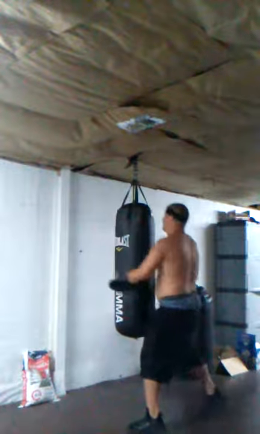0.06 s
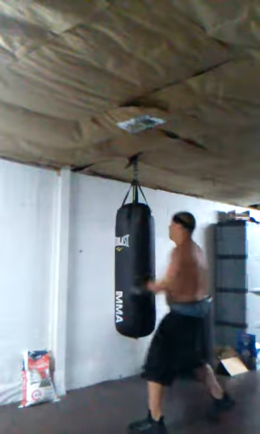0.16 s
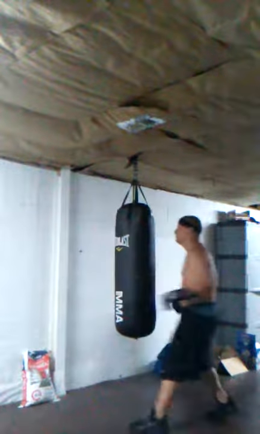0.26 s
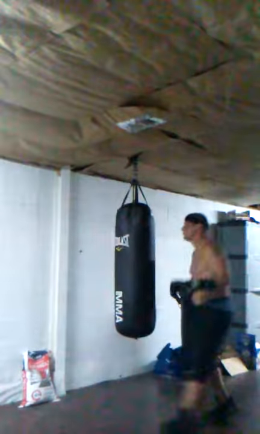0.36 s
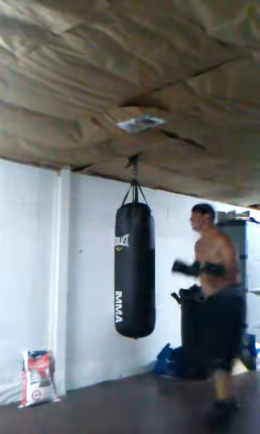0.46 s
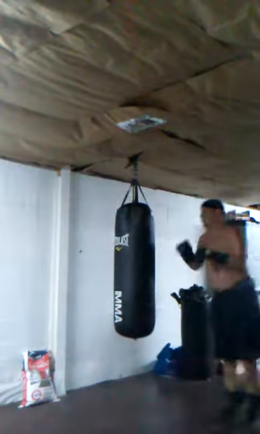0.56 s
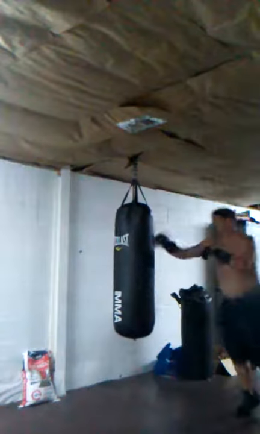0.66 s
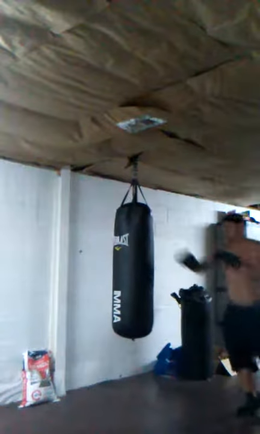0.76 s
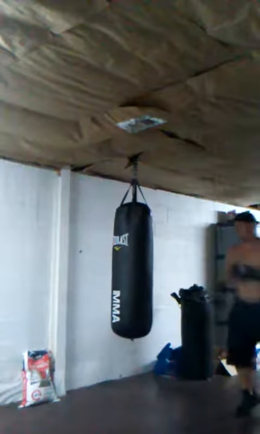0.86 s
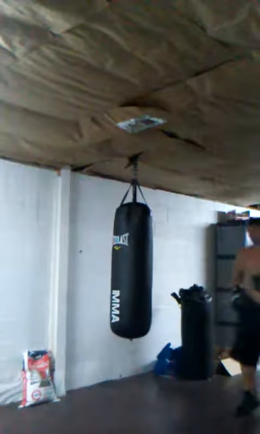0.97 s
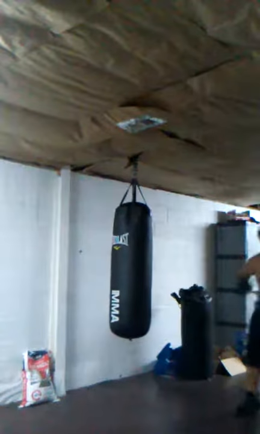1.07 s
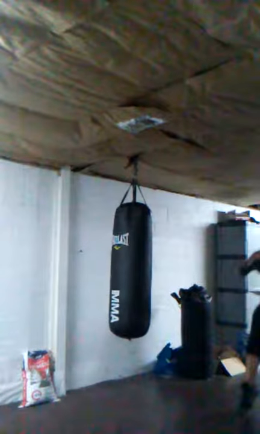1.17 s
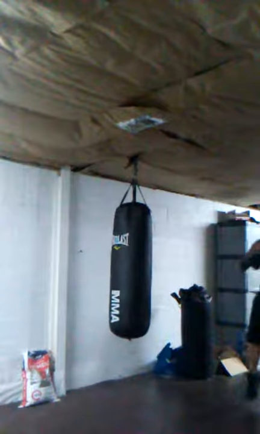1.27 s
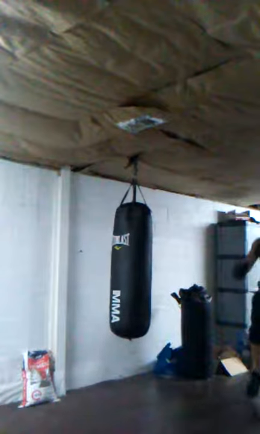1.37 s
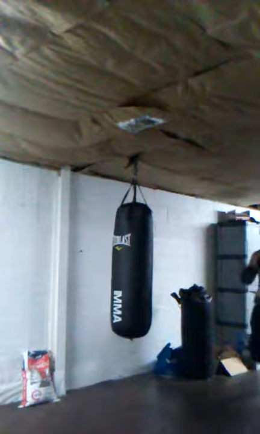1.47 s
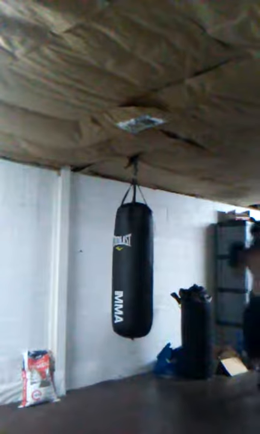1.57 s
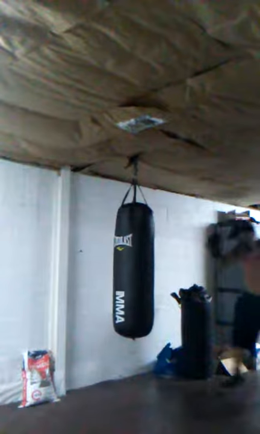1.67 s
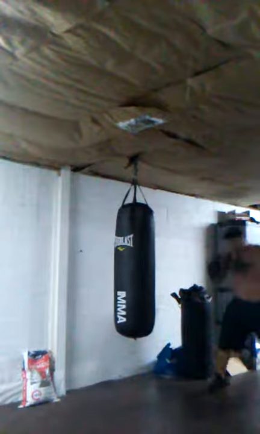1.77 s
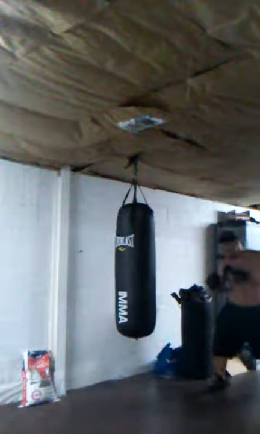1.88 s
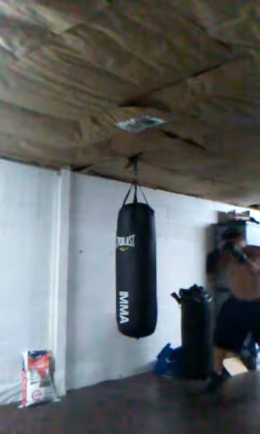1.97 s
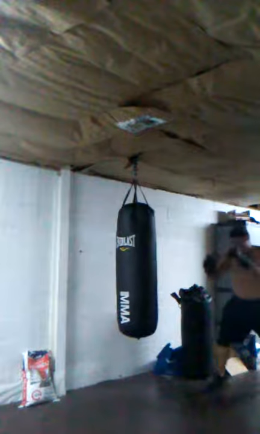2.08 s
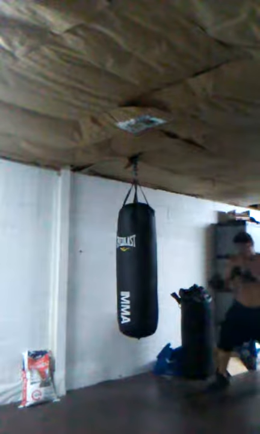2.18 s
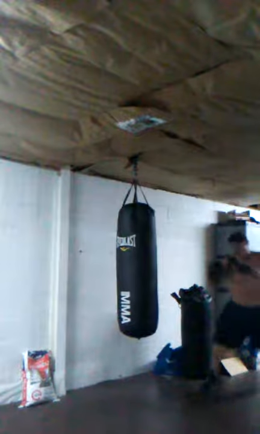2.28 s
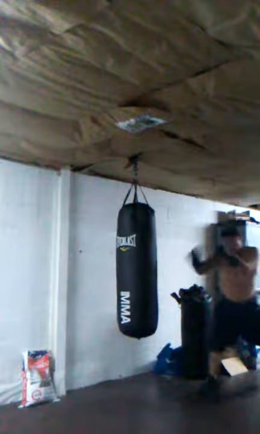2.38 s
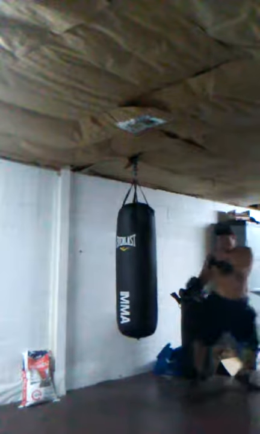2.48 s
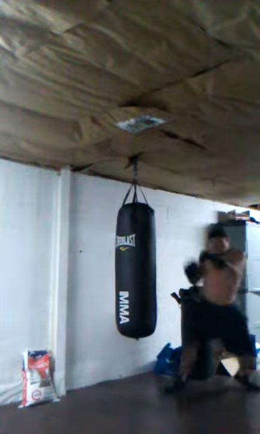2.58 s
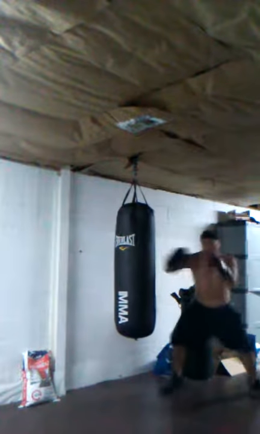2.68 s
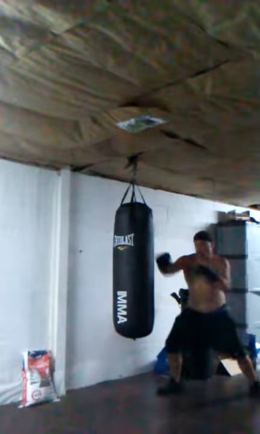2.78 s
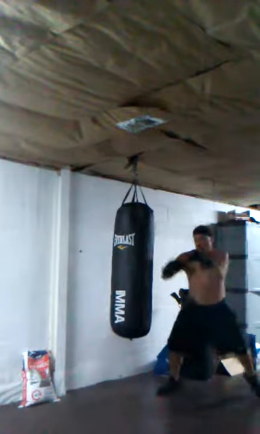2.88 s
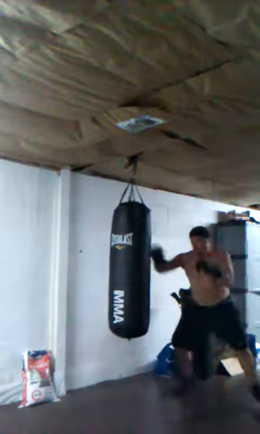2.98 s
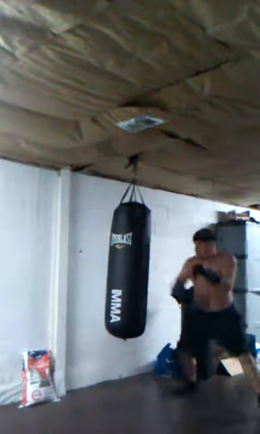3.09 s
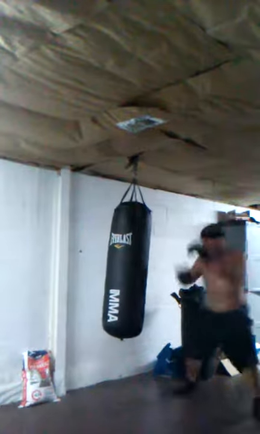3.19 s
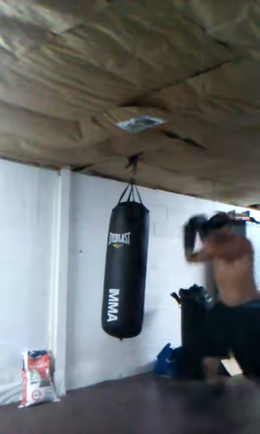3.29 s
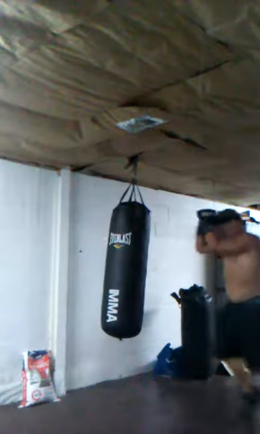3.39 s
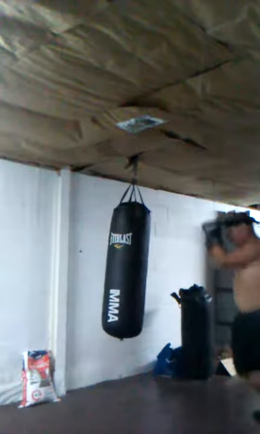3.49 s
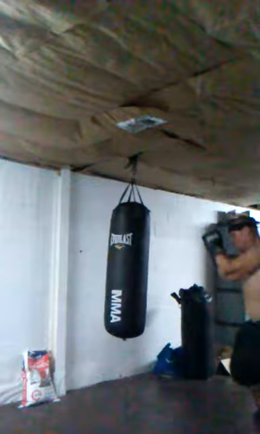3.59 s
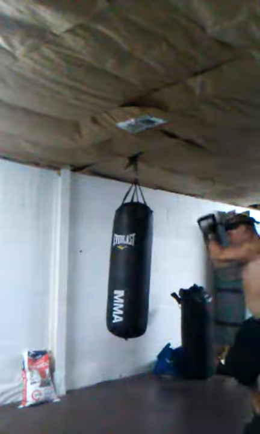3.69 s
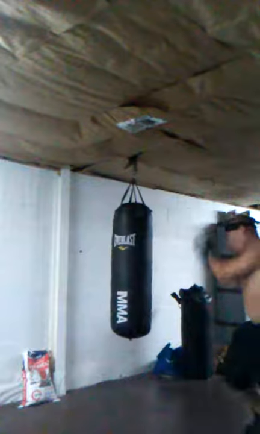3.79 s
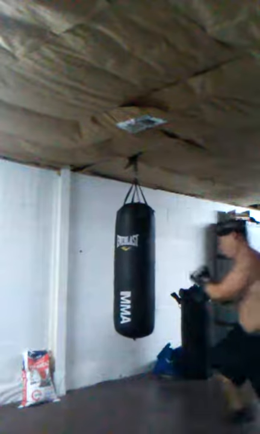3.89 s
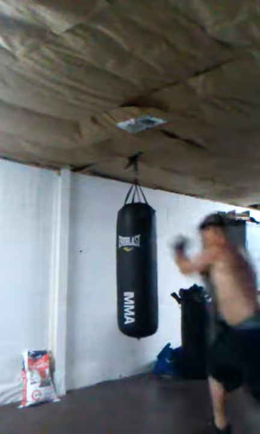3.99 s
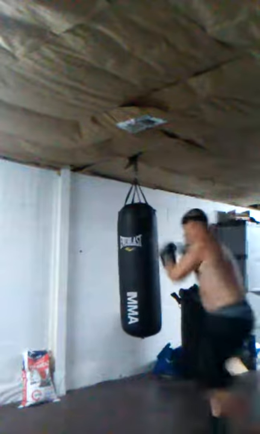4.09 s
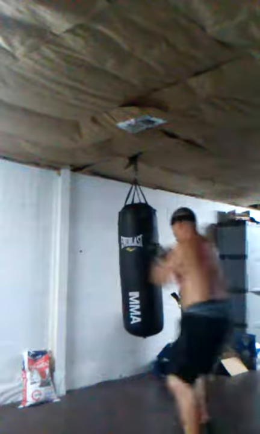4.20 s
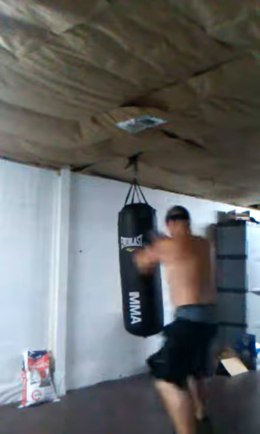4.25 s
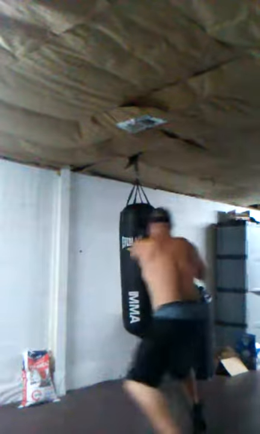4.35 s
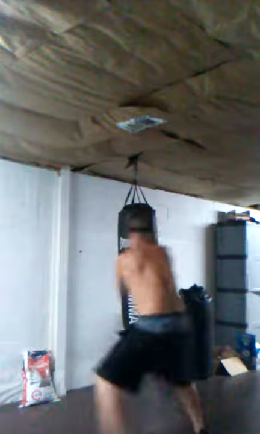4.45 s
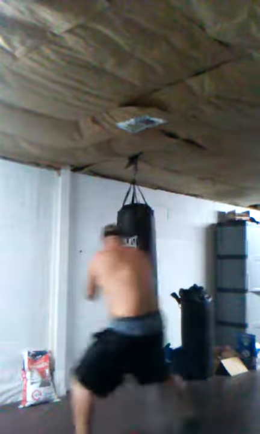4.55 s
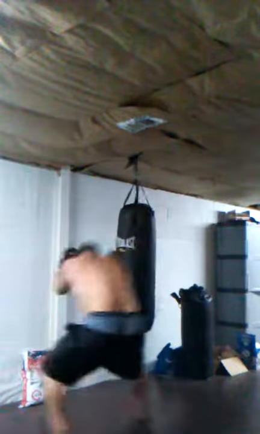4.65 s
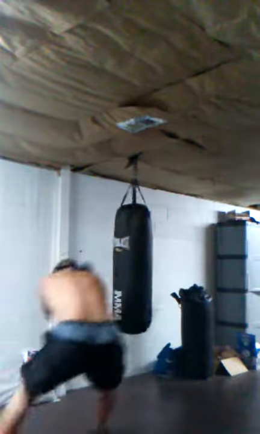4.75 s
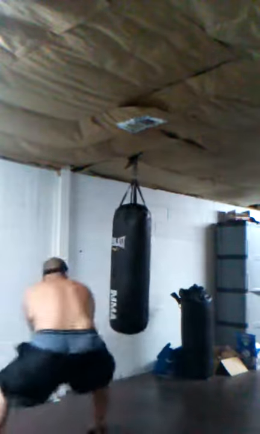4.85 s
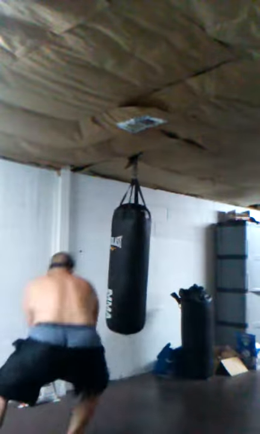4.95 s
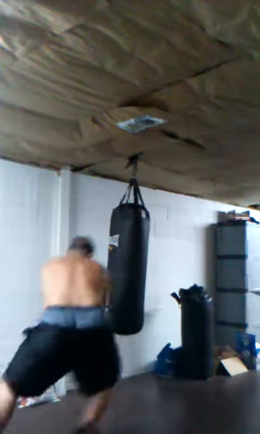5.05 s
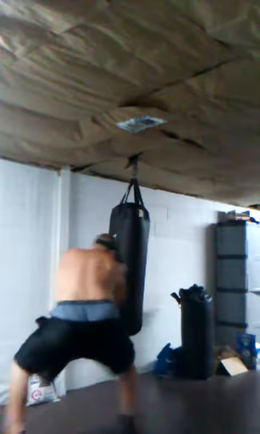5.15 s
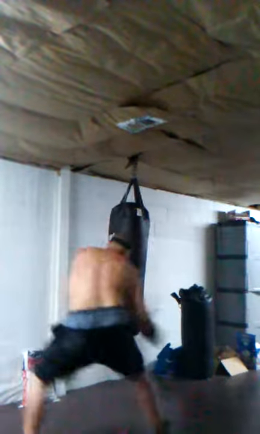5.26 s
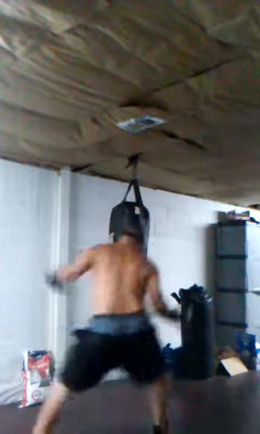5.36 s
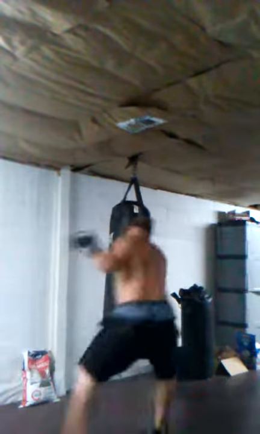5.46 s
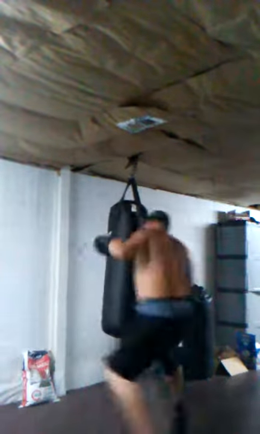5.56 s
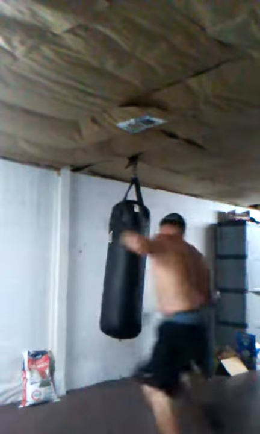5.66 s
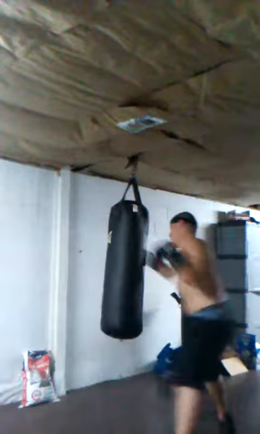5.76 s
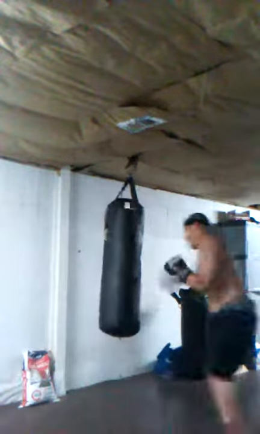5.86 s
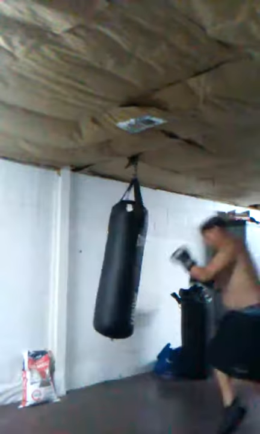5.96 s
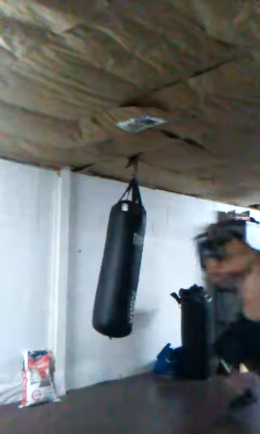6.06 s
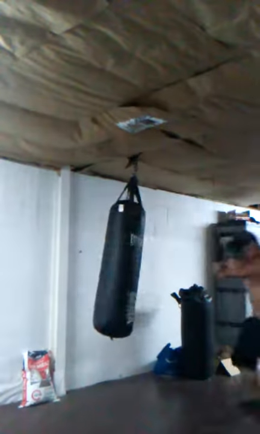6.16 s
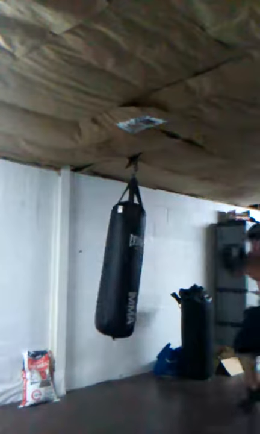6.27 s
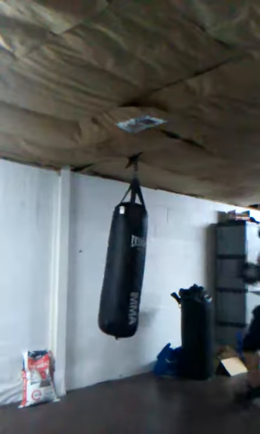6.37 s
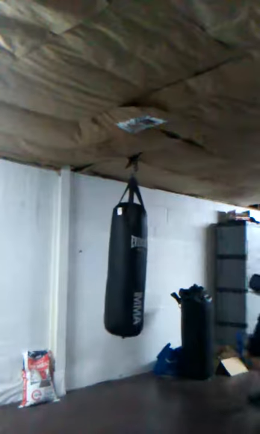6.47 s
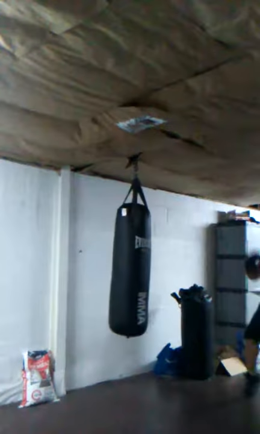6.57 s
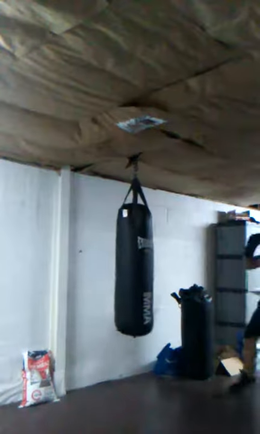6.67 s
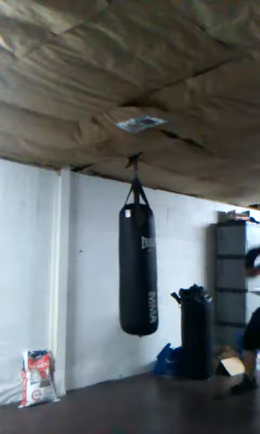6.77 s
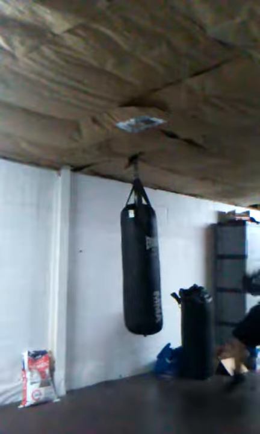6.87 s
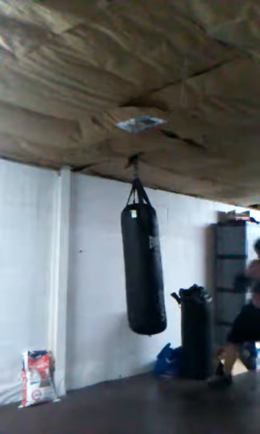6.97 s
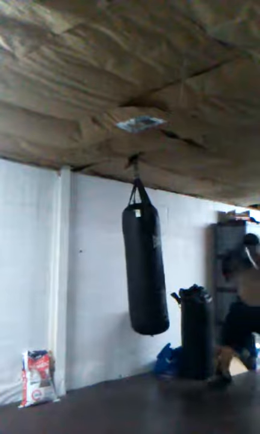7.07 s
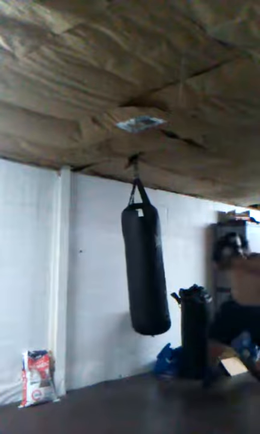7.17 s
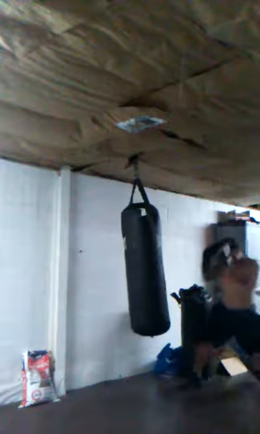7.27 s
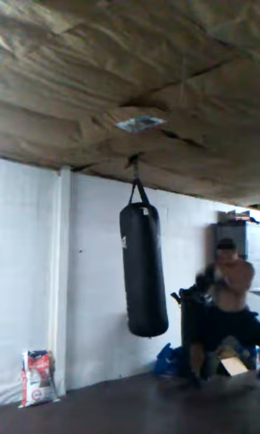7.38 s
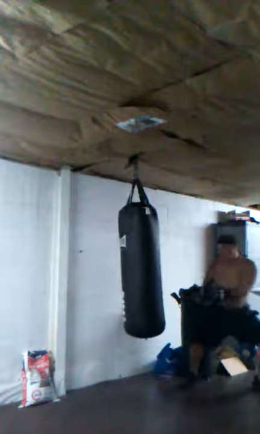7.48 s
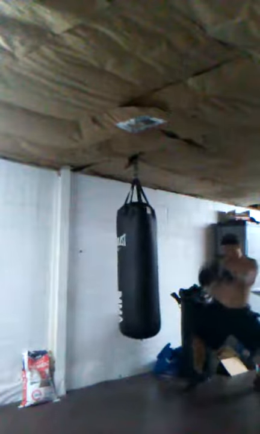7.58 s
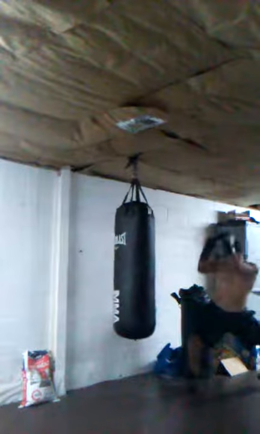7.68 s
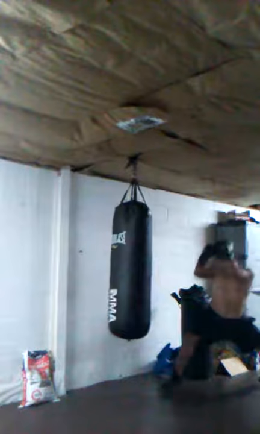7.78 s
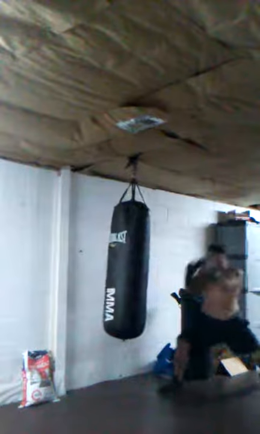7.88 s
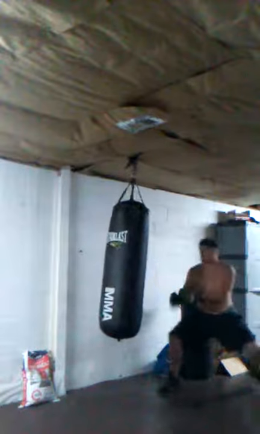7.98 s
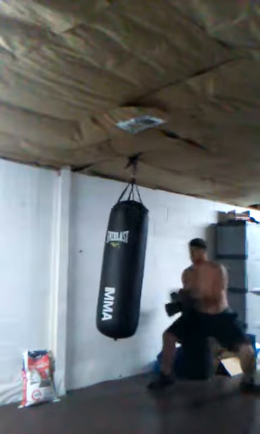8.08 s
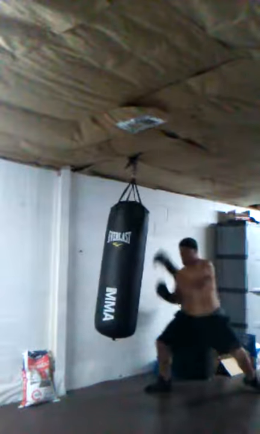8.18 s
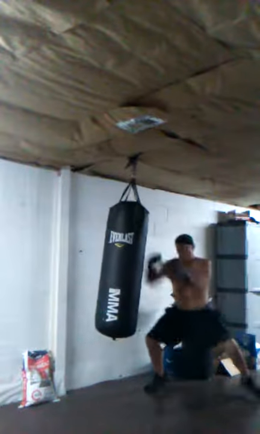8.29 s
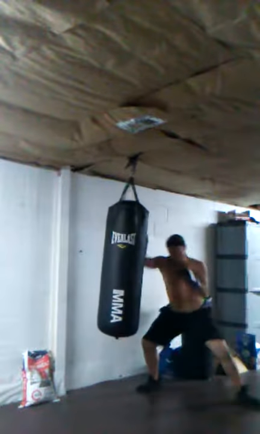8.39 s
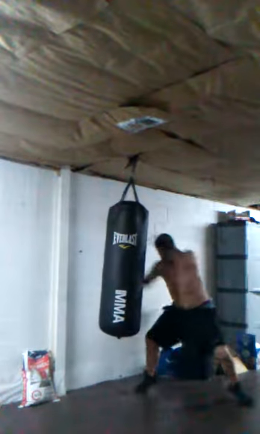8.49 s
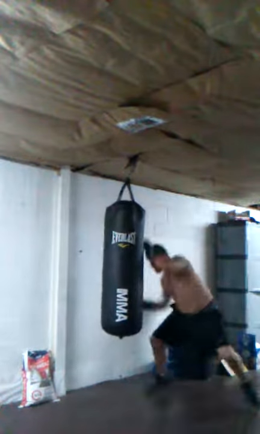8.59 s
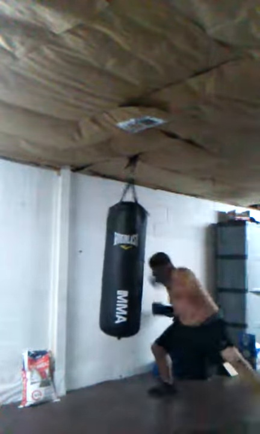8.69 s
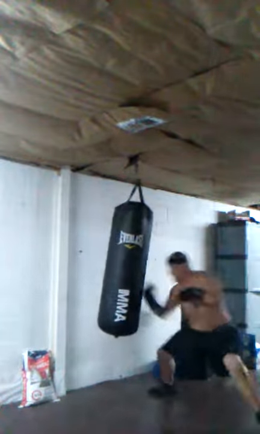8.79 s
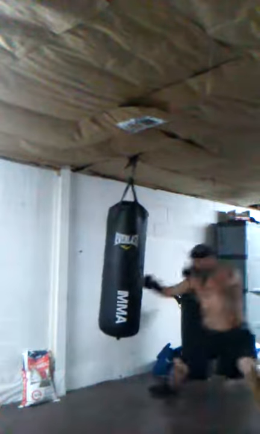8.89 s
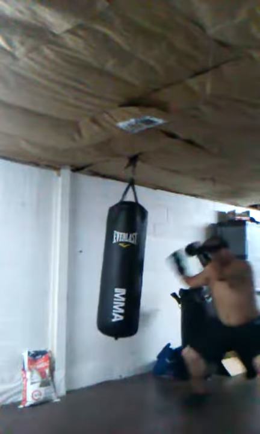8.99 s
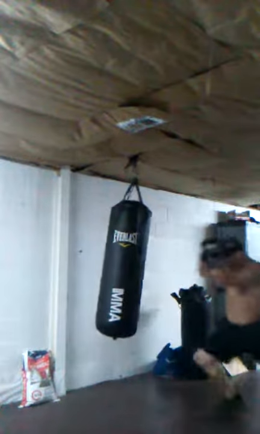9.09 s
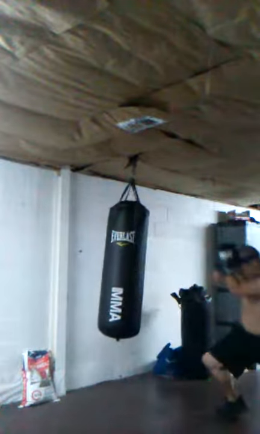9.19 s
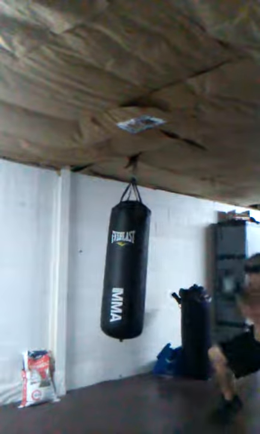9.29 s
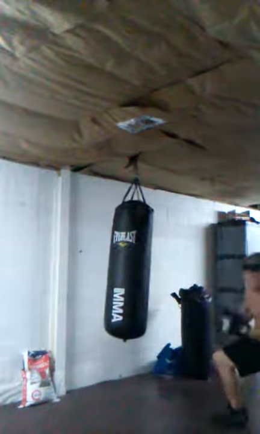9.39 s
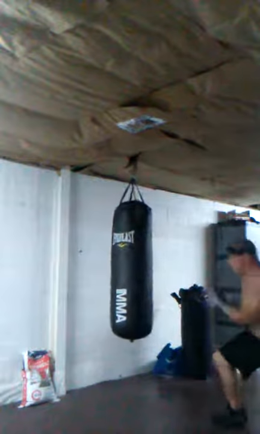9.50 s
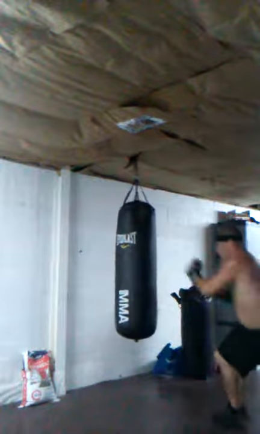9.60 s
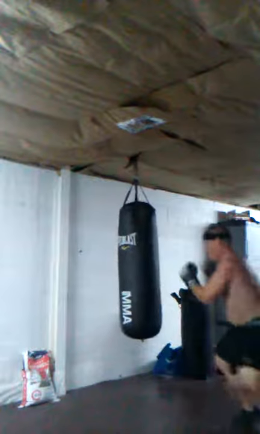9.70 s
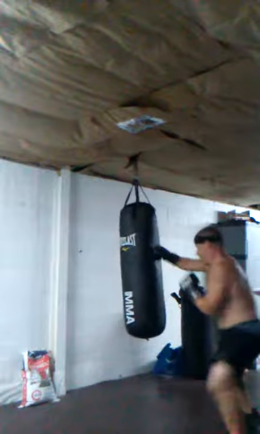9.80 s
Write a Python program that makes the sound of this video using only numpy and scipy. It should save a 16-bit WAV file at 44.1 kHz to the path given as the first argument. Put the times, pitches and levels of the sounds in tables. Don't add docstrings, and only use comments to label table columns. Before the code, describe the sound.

Sharp padded punches pop and boom on a swinging heavy bag, between shuffling soles, light knocks and clothing rustle over faint room hum and hiss.

```python
import sys
import numpy as np
from scipy import signal
from scipy.fft import rfft, irfft
from scipy.io import wavfile

SR = 44100
rng = np.random.default_rng(int(sys.argv[2]) if len(sys.argv) > 2 else 0)


def to_wav(s):
    ch = np.atleast_2d(s).T
    pcm = np.round(np.clip(ch, -1, 1) * 32767)
    wavfile.write(sys.argv[1], SR, pcm.astype(np.int16))


def gain_from_decibels(decibels):
    exponent = np.asarray(decibels, float) / 20
    return 10 ** exponent


N = 434385
SPAN = 16384

# (time [s], pop peak [dB], pop centre [Hz],
# slap relative to the pop [dB], joist boom [dB])
BLOWS = [(0.78, -23.5, 734, -1, -32), (2.887, -15, 895, -3, -24.5), (3.106, -16.5, 815, -5, -22.5),
         (3.294, -21, 1090, -9.5, -48), (4.292, -11.5, 847, -4, -21), (4.446, -15, 548, -0.9, -34),
         (4.586, -13, 565, -10, -21.5), (4.634, -17, 659, -5, -58), (4.889, -17.5, 390, -1, -57),
         (5.371, -13, 800, -5, -51), (5.599, -13, 572, -7, -20), (5.652, -17, 990, -17, -36),
         (5.728, -21.5, 930, -13.5, -34), (5.908, -8.5, 557, -3, -21), (6.04, -17, 960, -3.5, -38),
         (6.249, -20, 970, -15, -53), (8.473, -15, 1220, -5.5, -29), (8.488, -7.5, 487, -7, -19),
         (8.638, -14.5, 750, -8, -18.5), (8.683, -16.5, 1040, -10, -38), (8.949, -12.5, 782, -5, -17.5),
         (9.322, -25, 705, -6, -47)]
# (time [s], pop peak [dB], pop centre [Hz],
# slap relative to the pop [dB], floor boom [dB])
HEELS = [(0.583, -37, 1020, -21, -49), (2.875, -22, 571, -11, -52), (3.631, -36, 720, -1.2, -70),
         (4.249, -46, 815, 5, -57), (4.947, -22.5, 613, -11, -48), (5.288, -42.5, 1160, -12, -43),
         (5.769, -40, 990, -20, -30), (6.17, -27, 1110, -12, -41), (6.449, -35.5, 600, -7, -39),
         (6.671, -40.5, 1100, -29, -32), (7.563, -48, 900, -6, -58), (7.78, -62, 600, -12, -47),
         (7.882, -48, 638, -1, -61), (8.213, -42, 710, 2, -59), (8.873, -27.5, 670, -8, -31),
         (9.307, -25.5, 496, -14, -61)]


def rms_one(x):
    return x / np.sqrt(np.mean(x ** 2, axis=-1, keepdims=True) + 1e-20)


def at_hz(points, hz):
    table = np.array(points)
    return np.interp(np.log(hz + 1), np.log(table[:, 0]), table[:, 1])


def band(x, low_hz, high_hz):
    top_hz = min(high_hz, .45 * SR)
    return signal.sosfilt(signal.butter(2, [low_hz, top_hz], "band", fs=SR, output="sos"), x)


def drift(rate_hz):
    knots = rng.standard_normal(9000)
    return np.interp(np.arange(N) / SR * rate_hz, np.arange(len(knots)), knots)


def ring(clicks, hz, t60):
    r = gain_from_decibels(-60 / (t60 * SR))
    w = 2 * np.pi * hz / SR
    return signal.lfilter([0, np.sin(w)], [1, -2 * r * np.cos(w), r * r], clicks + 1e-18)


def grains(shape, per_s, spread_db):
    sizes = gain_from_decibels(spread_db * np.minimum(rng.exponential(1, shape), 3))
    signs = rng.choice([-1, 1], shape)
    return sizes * signs * (rng.random(shape) < per_s / SR)


def place(rows, starts):
    out = np.zeros(N + rows.shape[1])
    for row, start in zip(rows, (np.asarray(starts) * SR).astype(int)):
        out[start:start + len(row)] += row
    return out[:N]


def contact_rows():
    # (time [s], pop peak [dB], pop centre [Hz],
    # slap relative to the pop [dB], dull give relative to the pop [dB])
    sole_landings = [(1.032, -48, 690, -11, -27), (1.099, -47, 790, -15, -31),
                     (1.532, -35.5, 544, -23, -38), (1.92, -28, 754, -5.5, -39),
                     (2.269, -35.5, 750, -13, -32), (2.486, -17.5, 1003, -5, -43),
                     (2.73, -26, 570, -4, -43), (3.767, -36.5, 1290, 2, -18), (4.111, -19, 596, -5, -35),
                     (5.067, -30.5, 1760, 0, -17), (5.83, -20, 626, -11, -32), (6.839, -24.5, 686, -2, -42),
                     (7.105, -30.5, 590, -9.5, -25), (7.285, -42.5, 510, -7, -15),
                     (7.39, -29.5, 520, 3.5, -14), (7.949, -19, 890, 0.5, -36),
                     (8.249, -23.5, 454, -2.5, -39), (8.733, -21, 500, -5.5, -38),
                     (8.798, -21, 540, -12.5, -38), (9.085, -23.5, 550, -8, -23),
                     (9.166, -25.5, 740, -17, -21)]
    # (time [s], pop peak [dB], pop centre [Hz],
    # slap relative to the pop [dB])
    ring_knocks = [(3.915, -34, 1040, 2), (4.532, -27, 1000, -10), (5.045, -34, 645, -1),
                   (5.128, -40, 1140, -32), (5.166, -28.5, 1200, -24), (5.545, -33.5, 1240, 4),
                   (5.98, -19.5, 1090, -8), (6.056, -24.5, 970, -27), (6.109, -25, 630, -10.5),
                   (6.404, -28, 1060, -16), (6.477, -28.5, 930, -22), (6.532, -37, 1220, 1),
                   (6.59, -30.5, 995, -22), (8.619, -21.5, 1200, 1)]
    # events, dull give relative to the pop [dB], fizz relative to the slap [dB]
    kinds = [(BLOWS, -9.5, -3), (HEELS, -3.5, -4), (ring_knocks, -11, 4)]
    rows = []
    for events, body, fizz in kinds:
        for s, db, hz, slap, *_ in events:
            rows.append((s, db, hz, body, slap, slap + fizz))
    for s, db, hz, slap, body in sole_landings:
        rows.append((s, db, hz, body, slap, slap - 13))
    return rows


def contacts():
    table = contact_rows()
    click = np.zeros(2048)
    click[0] = -1
    fade = np.exp(-np.arange(len(click)) / SR / 0.012)
    rub = 0.019 * rng.standard_normal((len(table), len(click))) * fade
    rows = np.zeros_like(rub)
    for k, (s, pop_db, pop_hz, body, slap, fizz) in enumerate(table):
        push = click + rub[k]
        core_low, core_high = pop_hz / 1.42, pop_hz * 1.42
        core = band(band(push, core_low, core_high), core_low, core_high)
        parts = gain_from_decibels(16.0) * band(push, pop_hz / 6.4, pop_hz * 1.99) + gain_from_decibels(17) * core
        parts += gain_from_decibels(body + 25.5) * band(push, 121, 497)
        parts -= gain_from_decibels(slap + 12) * band(push, 2860, 6650)
        parts += gain_from_decibels(fizz + 15.0) * band(push, 11040, SR)
        rows[k] = gain_from_decibels(pop_db) * parts
    return place(garage(rows), np.array(table)[:, 0])


def jolts():
    blows = [(s, boom, -9 + 0.34 * boom + 0.67 * db) for s, db, *_, boom in BLOWS]
    return blows + [(s, boom - 14, boom) for s, *_, boom in HEELS]


def joist():
    # (frequency [Hz], level [dB], t60 [s])
    booms = [(58.5, -0.5, 0.3), (81.9, -2, 0.36), (88.5, -10.5, 0.48), (111, -13, 0.93)]
    s, low_db, upper_db = np.transpose(jolts())
    at = ((s + 0.0074) * SR).astype(int)
    chance = rng.standard_normal((len(at), len(booms)))
    out = np.zeros(N)
    for k, (hz, mode_db, t60) in enumerate(booms):
        clicks = np.zeros(N)
        jolt_db = upper_db if k else low_db
        clicks[at] = gain_from_decibels(jolt_db + mode_db + 1.1 * chance[:, k])
        out += ring(clicks, hz, t60)
    return signal.sosfilt(signal.butter(2, 110, fs=SR, output="sos"), out)


def drags():
    # (time [s], length [s], grit [dB], sheen [dB])
    long_slides = [(0.044, 0.12, -50, -46.5), (0.402, 0.23, -36.5, -36.5), (0.643, 0.22, -49.5, -50),
                   (1.532, 0.13, -55, -51), (2.26, 0.11, -56, -56), (2.57, 0.09, -47.5, -50.5),
                   (2.764, 0.27, -45, -46), (2.996, 0.12, -51, -53), (3.197, 0.45, -44.5, -64),
                   (3.384, 0.23, -43, -45.5), (4.75, 0.12, -32, -35), (4.962, 0.14, -42.5, -52),
                   (5.532, 0.13, -28, -32), (6.067, 0.16, -41.5, -48), (6.895, 0.092, -47, -56),
                   (7.693, 0.081, -52, -47.5), (7.797, 0.075, -51.5, -49), (8.327, 0.58, -57, -51.5),
                   (8.513, 0.088, -26.5, -34), (8.699, 0.11, -34, -34.5), (8.838, 0.097, -43, -84),
                   (9.097, 0.11, -37.5, -41), (9.355, 0.15, -39.5, -44.5), (9.723, 0.1, -40.5, -42.5)]
    # (time [s], grit [dB], tread [Hz])
    toe_scuffs = [(0.264, -65, 4400), (1.001, -61, 3600), (1.611, -46.5, 4270), (1.793, -43.5, 5000),
                  (2.073, -58.5, 3700), (3.628, -37, 5330), (3.686, -40, 3550), (3.812, -38, 4040),
                  (3.903, -31, 4400), (4.145, -42.5, 3700), (4.336, -41, 3750), (4.486, -42, 4250),
                  (5.042, -40, 3860), (5.208, -40, 5200), (5.313, -45, 4200), (5.44, -46, 3450),
                  (5.946, -22, 4230), (6.25, -39, 3250), (6.344, -38, 4300), (6.445, -40, 3700),
                  (6.539, -47, 3220), (6.736, -43.5, 5200), (7.15, -43.5, 3820), (7.285, -53, 4420),
                  (7.621, -59, 3300), (8.027, -51, 3800), (8.146, -45, 5000), (8.434, -40, 4200),
                  (8.988, -34.5, 4030)]
    scuff_s, scuff_sheen_db = .052, -6
    treads = 4600 * np.exp(.04 * rng.standard_normal(len(long_slides)))
    quick = [(s, scuff_s, db, db + scuff_sheen_db, hz) for s, db, hz in toe_scuffs]
    return np.r_[np.c_[long_slides, treads], quick]


def slides():
    t = np.arange(SPAN) / SR
    table = drags()
    grit = grains((len(table), SPAN), 12000, spread_db=1.5)
    rows = np.zeros_like(grit)
    for k, (s, length, grit_db, sheen_db, hz) in enumerate(table):
        stroke = np.sin(np.pi * np.clip(t / length, 0, 1)) ** .75
        dull_foot = 0.3 * band(grit[k], 1000, hz / 1.45)
        tread = rms_one(band(grit[k], hz / 1.63, hz * 1.56) + dull_foot) * gain_from_decibels(grit_db - 16.0)
        sheen = rms_one(band(grit[k], 10540, SR)) * gain_from_decibels(sheen_db - 9.5)
        rows[k] = stroke * (tread + sheen)
    return place(garage(rows), table[:, 0])


def squeaks():
    # (time [s], length [s], start [Hz], end [Hz], level [dB])
    squeak_events = [
        (2.851, 0.046, 6560, 6400, -27),
        (3.912, 0.021, 6900, 5300, -34.5),
        (9.315, 0.012, 6080, 5880, -29.5),
        (7.152, 0.03, 1350, 1310, -58.5),
        (7.731, 0.011, 2300, 1950, -69),
        (1.631, 0.031, 1500, 5700, -71),
    ]
    rows = np.zeros((len(squeak_events), SPAN))
    wobble, grip = drift(500), drift(250)
    for k, (s, length, start_hz, end_hz, db) in enumerate(squeak_events):
        share = .022 * np.sqrt(.025 / length) + .1 * abs(np.log(end_hz / start_hz))
        n, at = int(length * SR), int(s * SR)
        sway = wobble[at:at + n] - wobble[at:at + n].mean()
        pitch_hz = np.linspace(start_hz, end_hz, n) * (1 + share * sway)
        phase = 2 * np.pi * np.cumsum(pitch_hz) / SR
        shape = np.hanning(n) ** 0.033 * gain_from_decibels(db + 3.6 * grip[at:at + n])
        rows[k, :n] = shape * (np.sin(phase) + 0.19 * np.sin(2 * phase))
    return place(garage(rows), np.array(squeak_events)[:, 0])


def motion():
    # (time [s], rustle [dB])
    effort = [(0.0, -68), (0.65, -57), (1.0, -68), (1.36, -76), (1.7, -56.5), (2.3, -70), (2.8, -51),
              (3.4, -49), (5.0, -59), (6.5, -58.5), (6.95, -45.5), (7.1, -61.5), (7.7, -65.5), (8.05, -61),
              (8.35, -59.5), (9.45, -45.5), (9.6, -71), (9.85, -63.5)]
    shake_db, shake_t60_s, shake_rise_s = -30, 0.73, 0.017
    t = np.arange(N // 64 + 1) * 64 / SR
    blows = np.array(BLOWS)
    age = np.maximum(t - blows[:, :1], 0)
    shake = gain_from_decibels(blows[:, 1:2] + shake_db - 60 * age / shake_t60_s) * (1 - np.exp(-age / shake_rise_s))
    power = gain_from_decibels(np.interp(t, *np.transpose(effort))) ** 2 + np.sum(shake ** 2, axis=0)
    return np.interp(np.arange(N) / SR, t, 10 * np.log10(power))


def rustle():
    rustle_db = motion()
    rumble_db = -27.5 + 0.49 * rustle_db + 4.2 * drift(8)
    rub = grains(N, 6000, spread_db=1.5)
    coloured = rms_one(band(rub, 340, 2380)) + gain_from_decibels(0.5) * rms_one(band(rub, 1800, SR))
    rumble = rms_one(band(rng.standard_normal(N), 39, 261)) * gain_from_decibels(rumble_db - 2)
    clumps = gain_from_decibels(2.5 * drift(35))
    return coloured * clumps * gain_from_decibels(np.minimum(rustle_db - 0.5, -43)) + rumble


def garage(rows, tail_db=-20):
    # (frequency [Hz], t60 [s])
    decay = [(125, 0.31), (350, 0.46), (900, 0.37), (2400, 0.41), (6400, 0.38), (13000, 0.41)]
    # (delay [s], level [dB])
    reflections = [(.0021, 4), (.0045, 4.5), (.017, -6.5), (.021, -11.5)]
    places = min(len(rows), 24)
    t = np.arange(SPAN) / SR
    white = rng.standard_normal((places, 2, SPAN))
    shift = rng.uniform(-1, 1, (len(rows), len(reflections)))
    tail = np.zeros((places, SPAN))
    for k, hz in enumerate(125 * 2. ** np.arange(8)):
        octave = band(white[:, k % 2], hz / np.sqrt(2), hz * np.sqrt(2))
        tail += octave * gain_from_decibels(-60 * t / at_hz(decay, hz))
    tail = tail[np.arange(len(rows)) % places]
    echoes = np.zeros_like(tail)
    for k, (lag, db) in enumerate(reflections):
        delay = (lag * SR * (1 + .25 * shift[:, k])).astype(int)
        echoes[np.arange(len(rows)), delay] += gain_from_decibels(db)
    early = 1 + 1.024 * np.exp(-(t / 0.045) ** 2)
    response = gain_from_decibels(tail_db) * tail * early * (1 - np.exp(-t / 0.00023))
    response += signal.lfilter([.4], [1, -.6], echoes)
    response[:, 0] += 1
    return signal.fftconvolve(rows, response, axes=1)


def air():
    # (frequency [Hz], density [dB per Hz])
    spectrum = [(18, -52), (30, -40), (47, -4), (70, -19), (127, -7), (170, -31), (336, -12), (374, -12.5),
                (554, -23), (1190, -45.5), (8740, -33), (14400, -30), (16000, -39.5)]
    hz = np.fft.rfftfreq(N, 1 / SR)
    noise = irfft(rfft(rng.standard_normal(N)) * gain_from_decibels(at_hz(spectrum, hz)), N)
    return gain_from_decibels(-58.5) * rms_one(noise)


def scene():
    return (contacts() + joist() + slides() + squeaks() + rustle())[None]


def band_limit(x):
    return signal.sosfilt(signal.butter(12, 16960, fs=SR, output="sos"), x)


def record(dry):
    # (frequency [Hz], gain [dB])
    port = [(5500, 1), (6800, -0.5), (7600, -4.5), (8600, -5), (9600, -1.5), (11000, 2.5), (15000, -1.5)]
    # (frequency [Hz], gain [dB])
    top_cut = [(15900, 0), (16050, -38)]
    hz = np.fft.rfftfreq(N, 1 / SR)
    coloured = irfft(rfft(dry + air()) * gain_from_decibels(at_hz(port, hz)), N)
    coloured = signal.sosfilt(signal.butter(4, 47, "high", fs=SR, output="sos"), coloured)
    rounded = 1.5 * np.tanh(coloured / 1.5)
    mix = irfft(rfft(rounded) * gain_from_decibels(at_hz(top_cut, hz)), N)
    return band_limit(mix)


dry = scene()
out = record(dry)
to_wav(out)
```